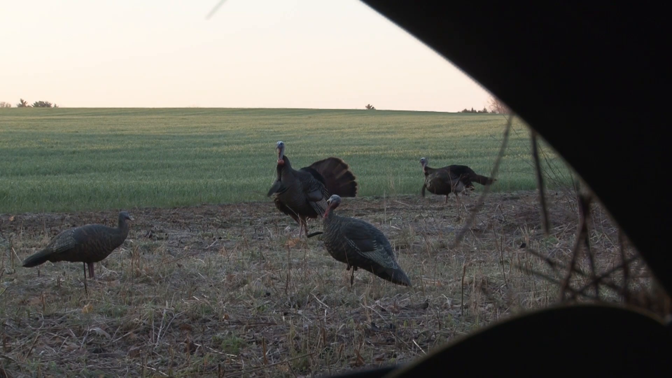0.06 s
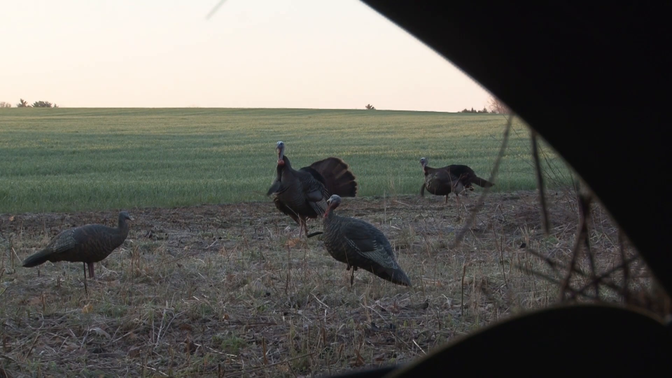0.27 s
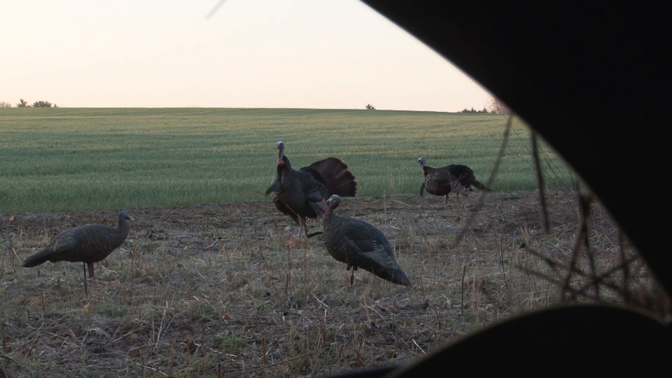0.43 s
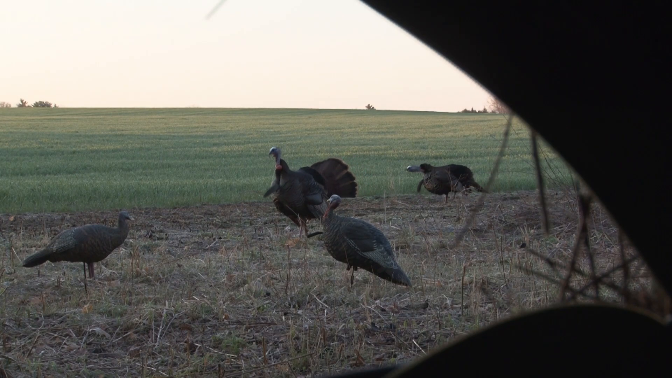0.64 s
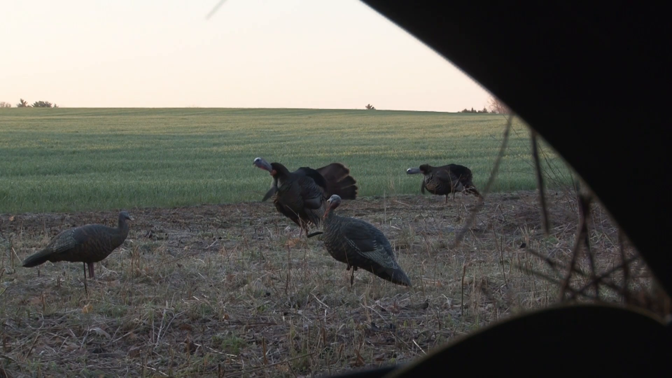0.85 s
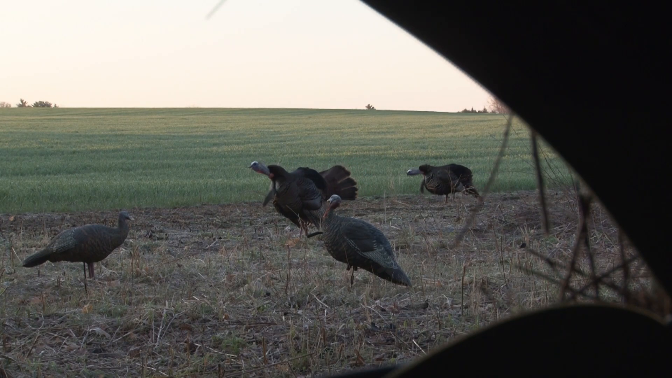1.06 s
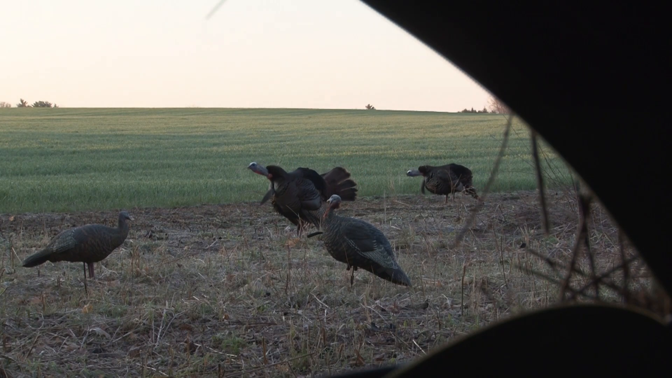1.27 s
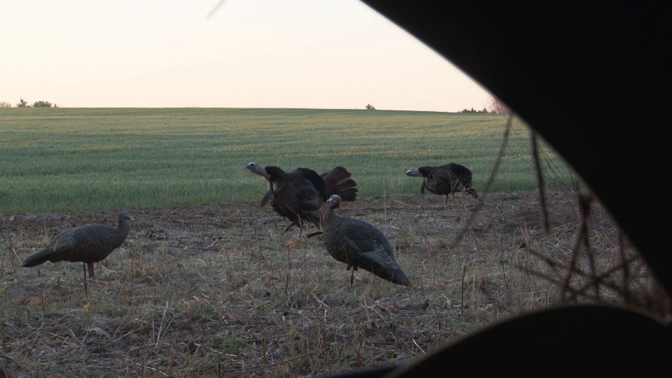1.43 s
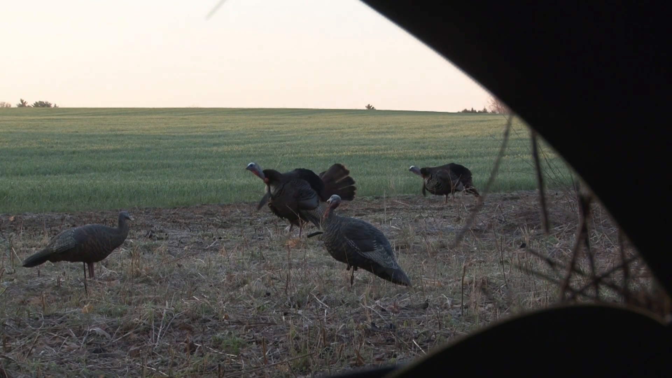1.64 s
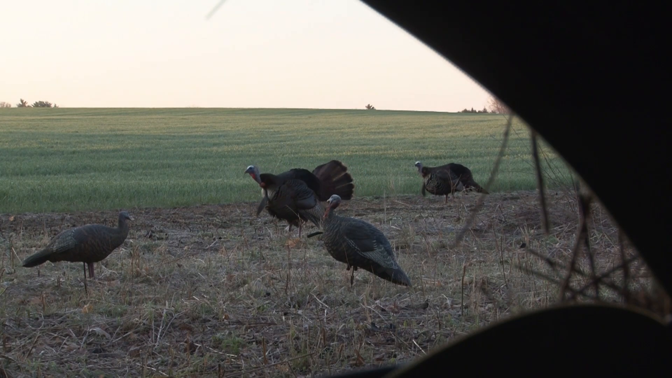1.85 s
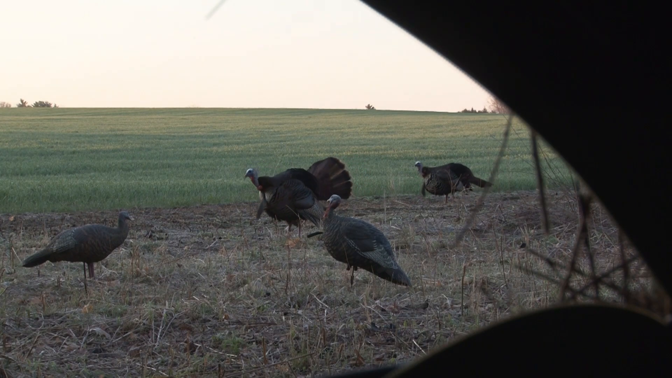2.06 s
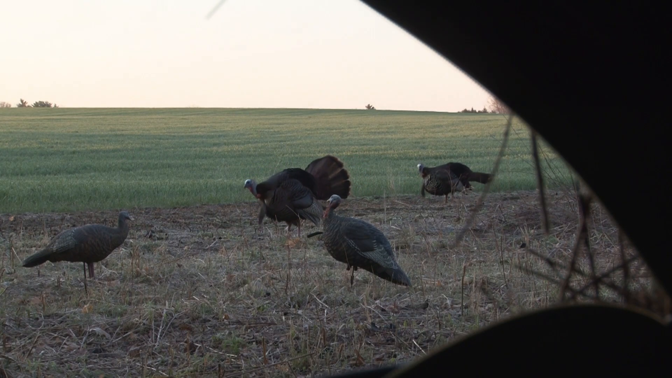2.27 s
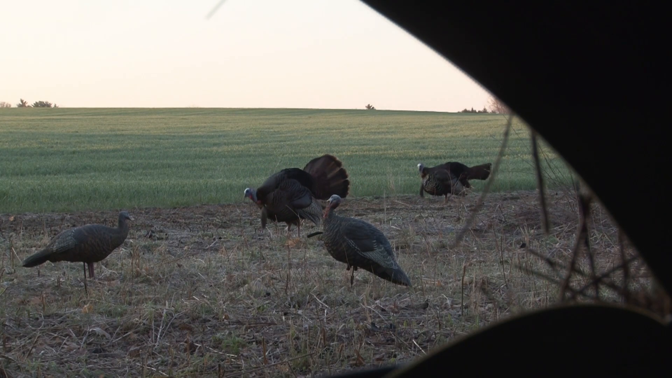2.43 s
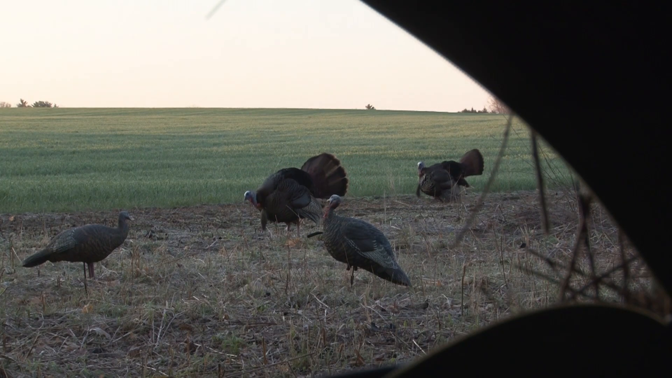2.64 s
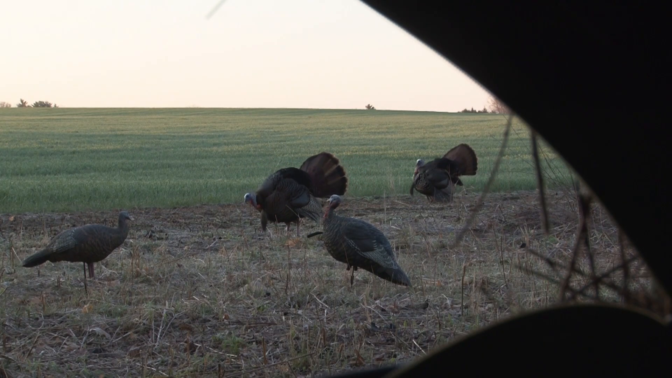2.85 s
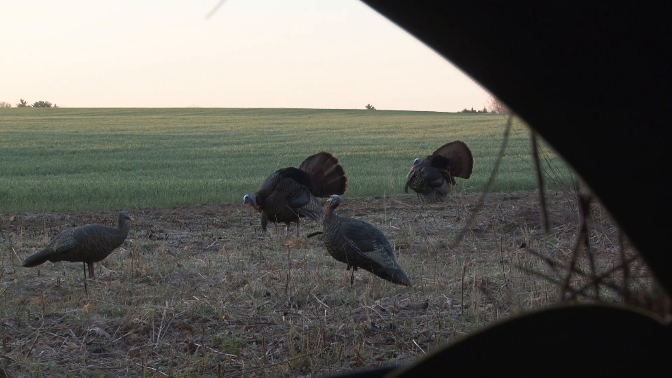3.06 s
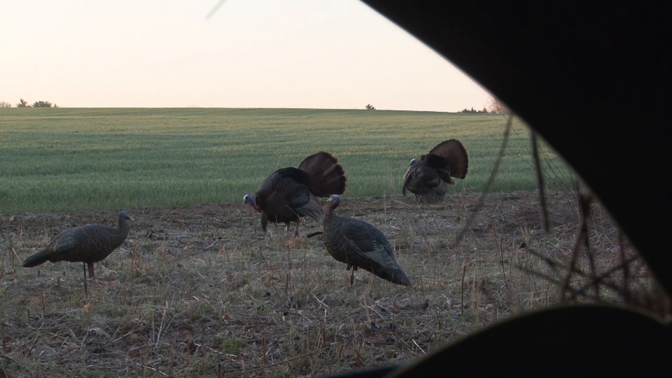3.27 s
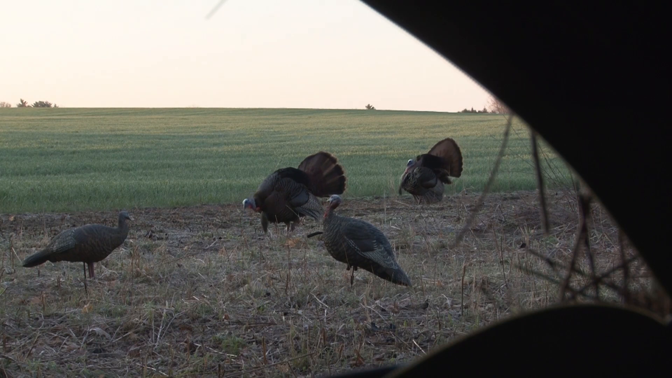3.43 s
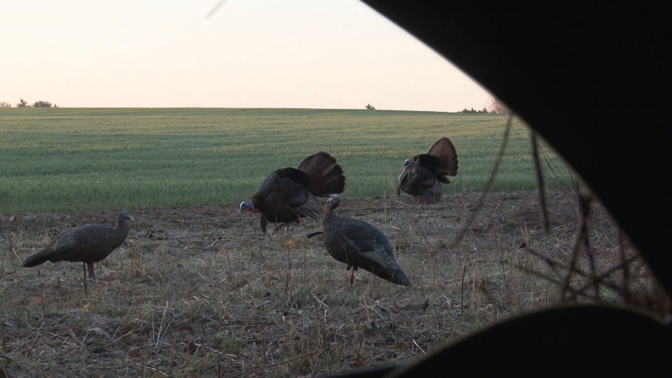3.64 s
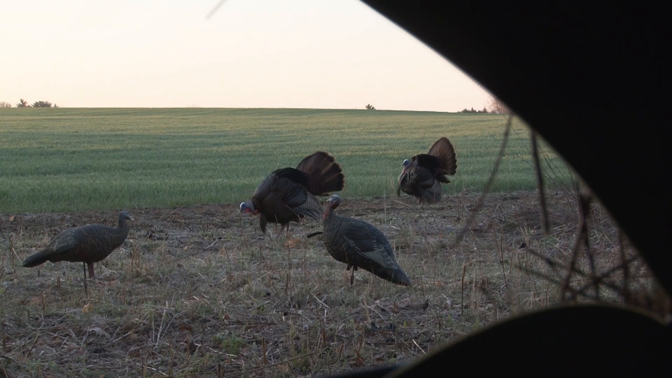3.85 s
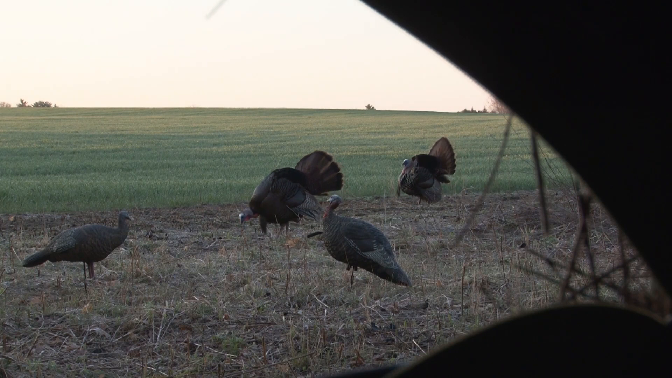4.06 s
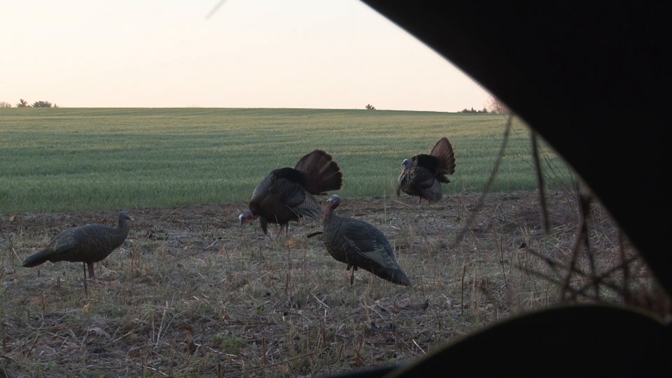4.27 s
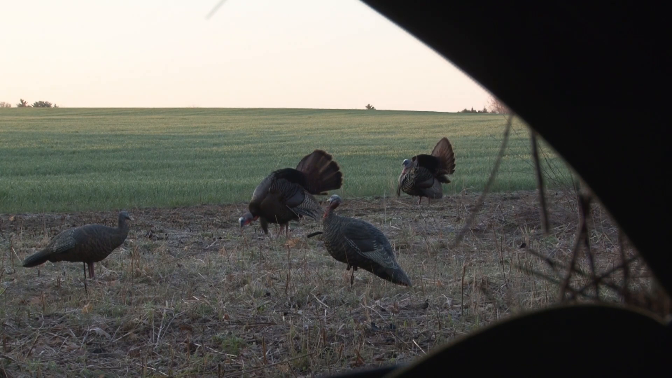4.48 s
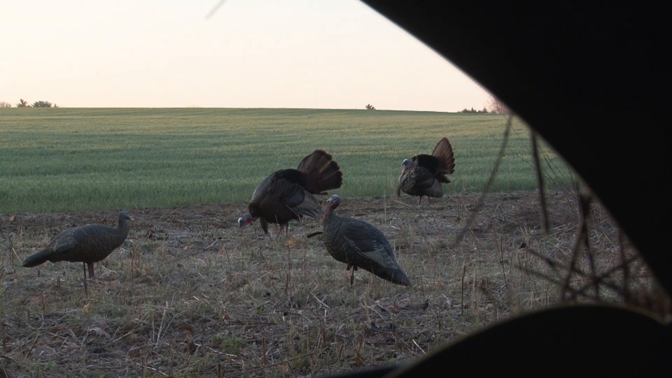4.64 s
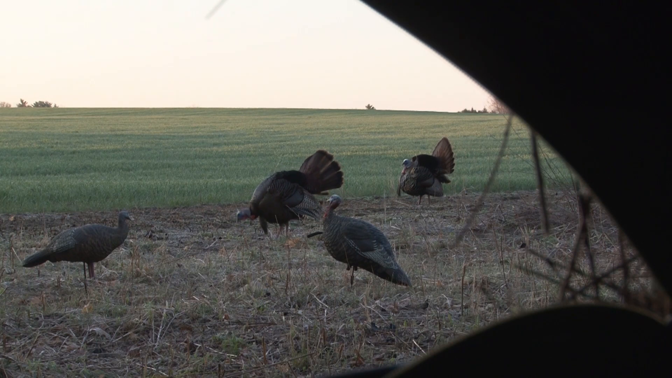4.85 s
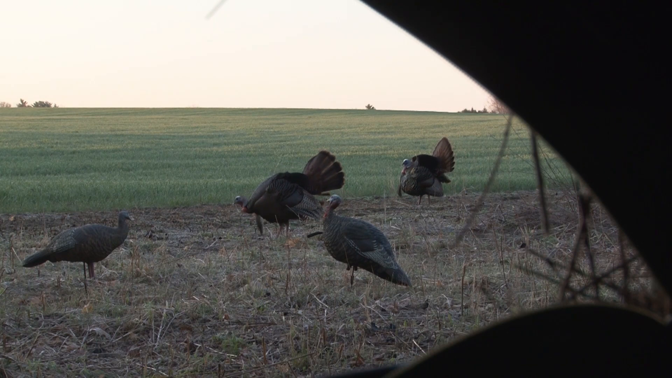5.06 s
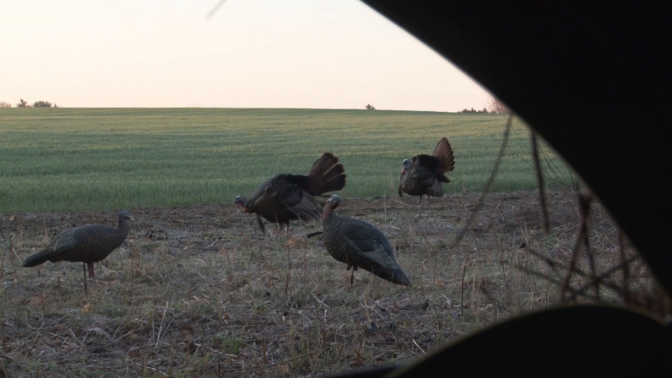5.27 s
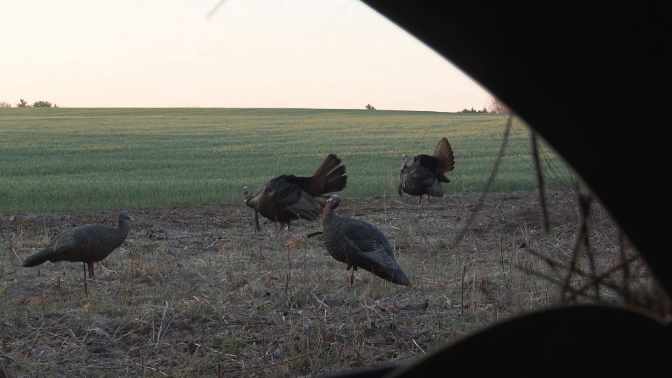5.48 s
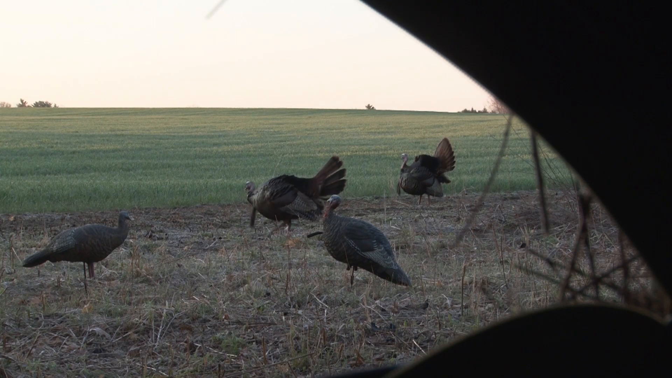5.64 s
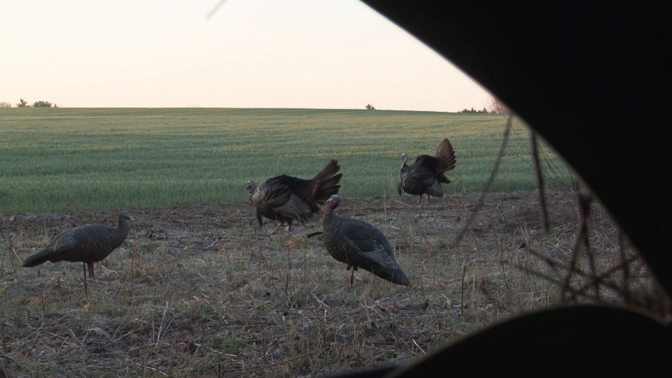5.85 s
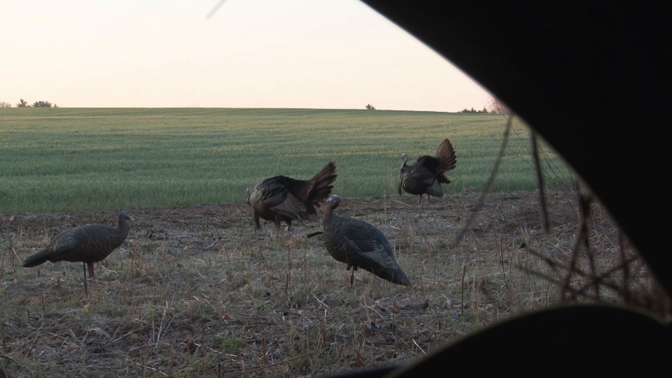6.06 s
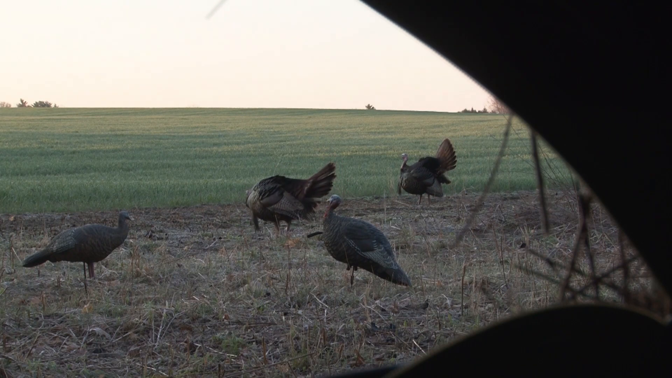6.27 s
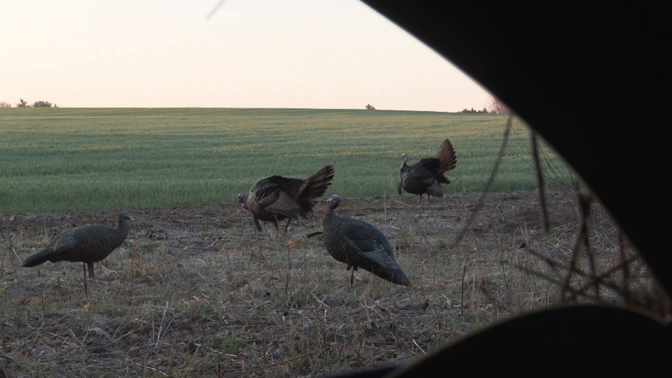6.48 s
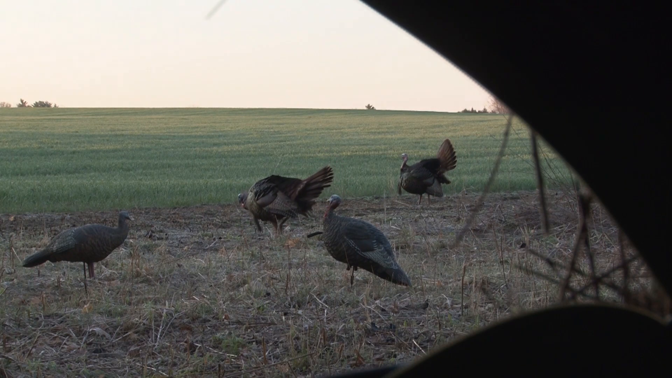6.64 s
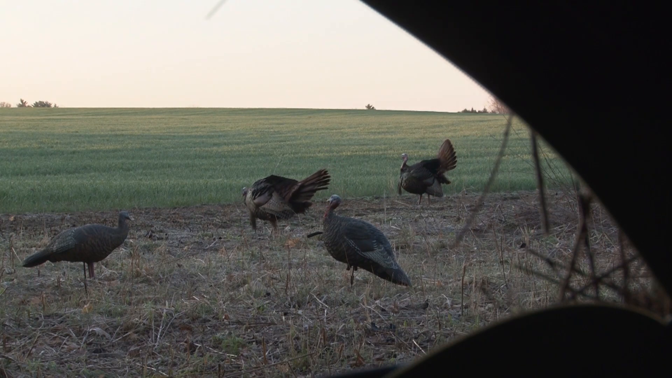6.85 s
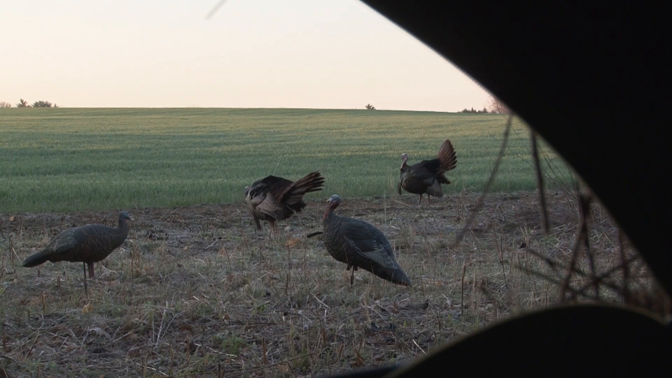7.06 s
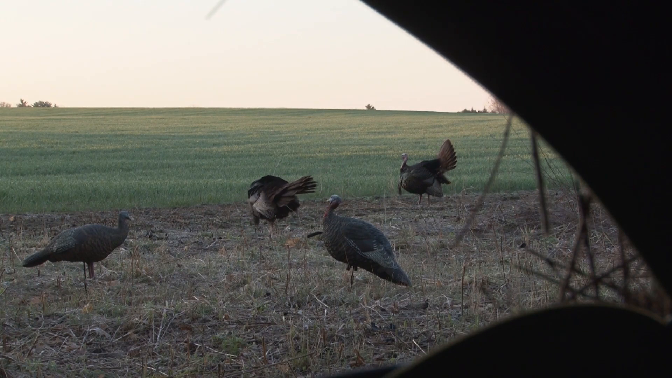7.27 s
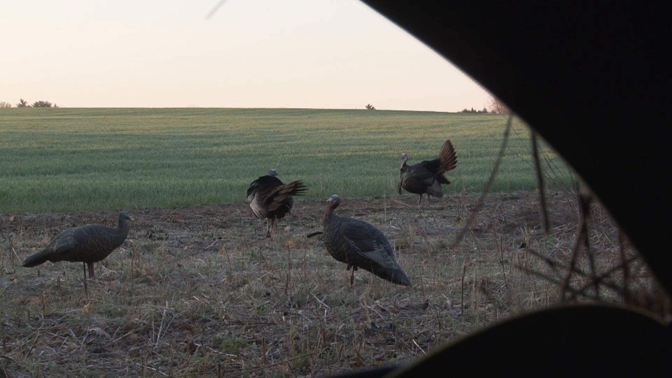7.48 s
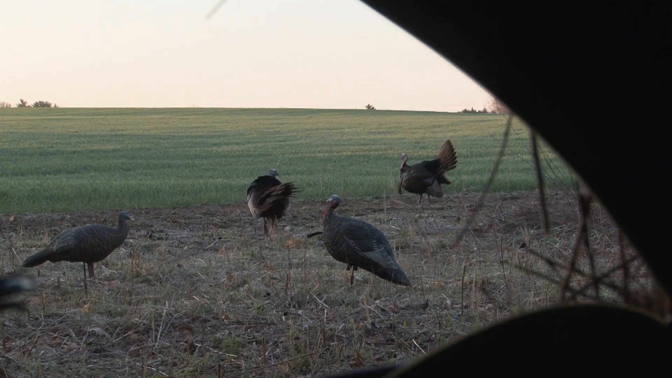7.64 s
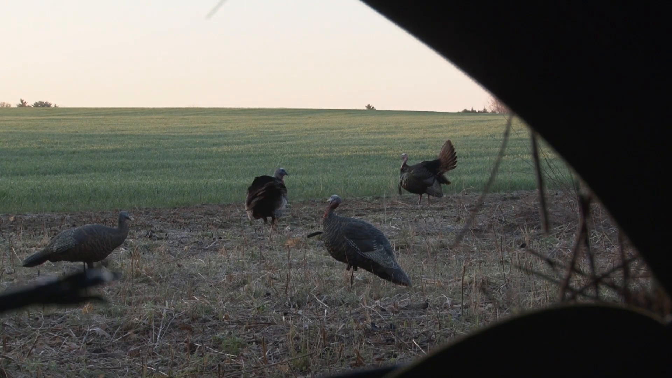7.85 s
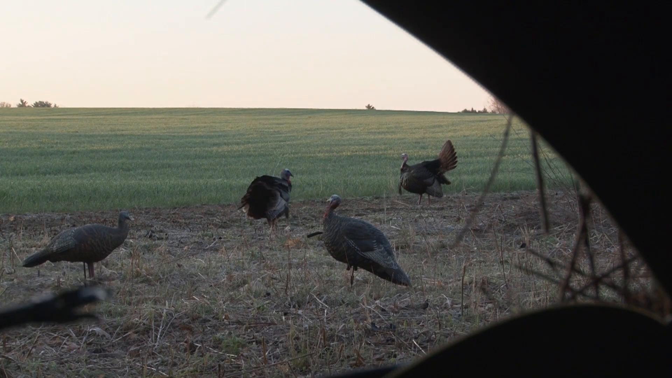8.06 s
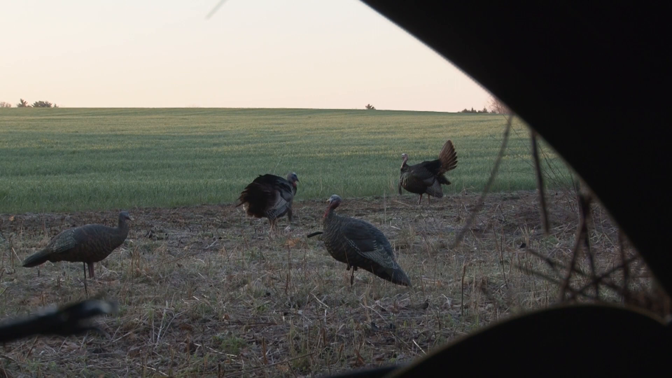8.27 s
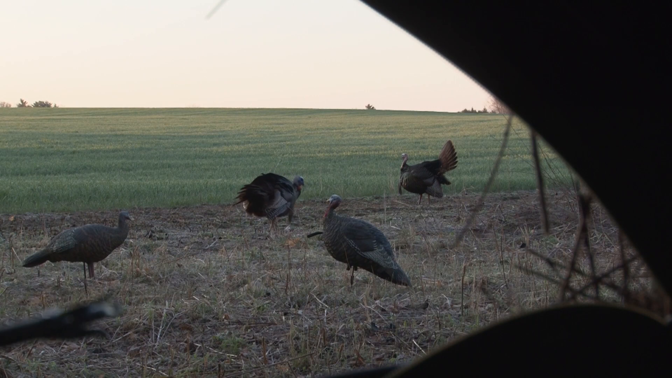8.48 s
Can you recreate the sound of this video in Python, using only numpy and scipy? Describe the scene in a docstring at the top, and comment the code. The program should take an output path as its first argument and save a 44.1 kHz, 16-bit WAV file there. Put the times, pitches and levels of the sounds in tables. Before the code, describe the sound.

A wild turkey tom gobbles loudly nearby, hoarse yelps tumbling into a fast rattle, a second joining farther off, then quiet field hum, rustles and faint birdsong.

```python
"""An open field: far hum, wash, hiss and road drone, coloured noises, under a thin steady whine (a sine).
At 0.5 s a wild turkey tom gobbles a few metres from a ground blind, and a second one further off joins in.
Rough harmonic syllables, yelps then rattle, ride on a low noise throb; blind, stubble and trees scatter them.
The level dips briefly at 2.2 s. Shaped noise then gives scuffs, snaps and rustles in the dry stalks,
and gliding sines give faint songbirds from 3.4 s. The drone fades from 3.1 s."""
import sys
import numpy as np
from scipy import signal
from scipy.fft import rfft, irfft
from scipy.io import wavfile

SR = 44100
rng = np.random.default_rng(int(sys.argv[2]) if len(sys.argv) > 2 else 0)


def wav_record(signal):
    """Record a signal, one row per channel, as 16-bit PCM in the file named by sys.argv[1]."""
    frames = np.transpose(np.atleast_2d(signal))
    bounded = np.clip(frames, -1, 1)
    # unit amplitude maps onto the largest positive 16-bit level
    quanta = np.round(bounded * 32767).astype(np.int16)
    wavfile.write(sys.argv[1], SR, quanta)


N = 375291
TIME = np.arange(N) / SR
FREQ = np.maximum(np.arange(N // 2 + 1) * SR / N, 1)

# swell of background and road: [t/s, level/dB]
SWELL = [(.18, -8), (.45, 3), (1.9, 2), (2.35, 0.5), (8.5, 0)]
# hoarse yelps that open the gobble: [mid t/s, half length/s, level/dB, pitch f/Hz, glide/+-share,
# throat resonance f/Hz, roughness/0-1, rasp level re syllable/dB]
YELPS = [(0.535, 0.03, -24, 588, 0.073, 1660, 0.44, -28),
         (0.594, .037, -26, 661.5, -0.15, 1320, 0.78, -16.5),
         (0.668, 0.032, -36, 634, -0.17, 1300, 0.72, -18), (0.723, .014, -31, 550, 0.11, 1390, 0.5, -14.5),
         (0.742, .025, -25, 529, .07, 1540, 0.46, -20), (0.769, .024, -24.5, 607, -0.039, 1450, 0.52, -30),
         (0.79, 0.018, -24, 670, -0.055, 1266, 0.11, -20.5),
         (.808, .024, -26, 532.3, -0.273, 1030, 0.39, -18),
         (0.878, .03, -35, 547, -0.101, 1190, 0.88, -17.5)]
# beats of the rattle that follows: [mid t/s, half length/s, level/dB, throat resonance f/Hz]
RATTLE = [(0.914, 0.011, -38, 1490), (.929, .028, -28.5, 1338), (0.959, .02, -28.5, 1293),
          (0.977, .017, -29, 1390), (1.001, .016, -28.5, 1295), (1.017, .023, -27.5, 984),
          (1.079, 0.032, -32, 1237), (1.12, .012, -27.5, 1246), (1.133, .023, -28, 1490),
          (1.203, 0.028, -32, 1061), (1.261, 0.018, -27, 1063), (1.299, .034, -28.5, 1415),
          (1.38, 0.029, -25.5, 1286), (1.439, .017, -25, 1171), (1.462, .035, -27, 1381),
          (1.528, 0.015, -28, 1055), (1.546, .02, -27.5, 1153), (1.604, 0.017, -27.5, 1024),
          (1.663, 0.013, -34, 1097)]


def undb(db):
    """Decibels to gain."""
    return 10 ** (np.asarray(db) / 20)


def unit(x):
    """Scale to rms 1."""
    return x / np.sqrt(np.mean(x ** 2) + 1e-20)


def curves(table):
    """Columns of a time table, one value a sample."""
    s, *columns = np.transpose(table)
    return [np.interp(TIME, s, c) for c in columns]


def colour(points):
    """Gain at every frequency from (f/Hz, level/dB) points, linear in log f."""
    hz, db = np.transpose(points)
    return undb(np.interp(np.log(FREQ), np.log(hz), db))


def filtered(x, gain):
    """Apply a gain per frequency."""
    return irfft(rfft(x) * gain, N)


def noise(gain, channels=2):
    """Independent coloured noises, rms 1 overall."""
    return unit(filtered(rng.standard_normal((channels, N)), gain))


def resonance(hz, centre_hz, width_hz):
    """Gain of one resonance, 1 at its centre."""
    return 1 / np.sqrt(1 + ((hz ** 2 - centre_hz ** 2) / (hz * width_hz)) ** 2)


def walk(rate_hz, size=N):
    """Smooth random curve, spread near 1, with rate_hz new values a second."""
    place = np.arange(size) * rate_hz / SR
    count = int(place[-1]) + 2
    return np.interp(place, np.arange(count), rng.standard_normal(count)) * np.sqrt(3 / 2)


def bump(t, centre_s, width_s):
    """Gaussian rise and fall, 1 at its centre."""
    return np.exp(-((t - centre_s) / width_s) ** 2)


def pan(x, left_db):
    """Place a sound by its left minus right level."""
    return x * undb(np.array([[left_db], [-left_db]]) / 2)


def tilt(points):
    """Left and right gains from left minus right (f/Hz, level/dB) points."""
    ratio = colour(points)
    return np.sqrt([ratio, 1 / ratio])


def add(track, start_s, x):
    """Mix x into the track at a time."""
    i = int(start_s * SR)
    track[i:i + len(x)] += x[:N - i]


def background(flicker_db=0.65):
    """Far low hum, mid wash and treble hiss, each flickering on its own, plus a steady sine whine."""
    # relative spectrum: [f/Hz, level/dB per Hz]
    air_points = [(25, -23), (45, -22), (65, -9.5), (95, 0), (135, -13), (240, -19), (400, -15.5),
                  (700, -11), (950, -8.5), (1200, -14.5), (1550, -15.5), (2100, -29.5), (3800, -36),
                  (15000, -42)]
    # left minus right: [f/Hz, level/dB]
    air_pan = [(60, -16), (110, -16.5), (200, -15.5), (380, -0.5), (700, 0.5), (1300, 5.5), (2400, 4),
               (5000, 2.5), (15000, -3)]
    # extra level of the mid band: [t/s, level/dB]
    wash_levels = [(.3, -0.5), (1.8, 1.5), (2.8, -2), (4.8, -0.5), (5.5, 0), (8.5, 0.5)]
    air_db, hum_db = -53.5, -1.5
    whine_hz, whine_db = 13415, -94

    air = filtered(noise(colour(air_points)), tilt(air_pan))
    low = 1 / (1 + (FREQ / 300) ** 4)
    high = 1 / (1 + (2200 / FREQ) ** 4)
    hum = filtered(air, low) * undb(hum_db + 2 * flicker_db * walk(12))
    wash = filtered(air, 1 - low - high) * undb(curves(wash_levels)[0] + flicker_db * walk(12))
    hiss = filtered(air, high) * undb(flicker_db / 2 * walk(12))
    whine = undb(whine_db) * np.sqrt(2) * np.sin(2 * np.pi * whine_hz * TIME)
    return undb(air_db + curves(SWELL)[0]) * (hum + wash + hiss) + whine


def road(centre_hz=715, width_hz=190, road_db=-57.5, leaves_s=3.12, fade_db_per_s=5):
    """Far drone, a narrow noise band, that fades as the traffic moves away."""
    fade_db = fade_db_per_s * np.maximum(TIME - leaves_s, 0)
    return noise(resonance(FREQ, centre_hz, width_hz) ** 2) * undb(road_db + curves(SWELL)[0] - fade_db)


def syllables():
    """Whole gobble, yelps then rattle, in the columns of YELPS; the rattle settles as the air runs out."""
    start_hz, settled_hz, settle_s = 578.5, 474, 0.168
    # a throat tuned above rest pulls the pitch up; pull is an exponent
    rest_throat_hz, throat_pull = 1245, 0.2454
    glide, rough, rasp_db = -0.0603, 0.33, -15.5
    rows = list(YELPS)
    for s, half_s, db, throat_hz in RATTLE:
        air_left = np.exp(-(s - RATTLE[0][0]) / settle_s)
        pull = (throat_hz / rest_throat_hz) ** throat_pull
        hz = (settled_hz + (start_hz - settled_hz) * air_left) * pull
        rows.append((s, half_s, db, hz, glide, throat_hz, rough, rasp_db))
    return rows


def neck(s, start_s=0.59, time_s=0.14):
    """The neck stretches out once: the windpipe rings more, the throat narrows and its skirts flatten."""
    # share of the wave sent back, throat width/Hz, skirt steepness
    pulled_in, stretched = np.array([.04, 1100, 3.04]), np.array([0.24, 600, 1.9])
    drawn_in = np.exp(-max(s - start_s, 0) / time_s)
    return drawn_in * pulled_in + (1 - drawn_in) * stretched


def windpipe(x, pitch_hz, share):
    """A wave returning once a cycle deepens the valleys between the partials; rms is kept."""
    feedback = np.r_[1, np.zeros(round(SR / pitch_hz) - 1), -np.clip(share, 0, .8)]
    return unit(signal.lfilter([1], feedback, x)) * np.sqrt(np.mean(x ** 2))


def syllable(half_s, pitch_hz, glide, throat_hz, rough, throat_width_hz, steep,
             leak_db=-28, half_db=-10, sharp=1.59, order=7):
    """One syrinx burst: an unsteady harmonic stack in the throat resonance, and the air flow it chops."""
    size = int(2 * half_s * SR)
    u = np.linspace(-1, 1, size)
    # slow bend plus faster jitter
    bend = .018 * walk(130, size) + .075 * rough * walk(400, size)
    hz = pitch_hz * (1 + glide * u) * np.exp(bend)
    phase = 2 * np.pi * np.cumsum(hz) / SR
    k = np.arange(1, order + 1)[:, None]
    centre_hz = throat_hz * (1 + glide * u)  # throat glides with the pitch
    leak = undb(leak_db) * resonance(k * hz, 2150, 2000)
    weight = (resonance(k * hz, centre_hz, throat_width_hz) ** 2 + leak) ** (steep / 2)
    weight = weight * undb(2.8 * np.array([walk(150, size) for _ in k]))
    # the throat delays partials above its resonance, so each cycle rings on
    lag = 2 * np.arctan((k * hz - centre_hz) / (throat_width_hz / 2))
    tone = np.sum(weight * np.cos(k * phase - lag), axis=0)
    # driven hard, the membranes beat strong-weak and their cycles vary in size
    uneven = undb(4.2 * rough * walk(380, size))
    uneven = uneven * (1 + 2 * rough * undb(half_db) * np.cos(phase / 2))
    swell = np.cos(np.pi * u / 2).clip(0) ** sharp
    voice = unit(tone * uneven * swell) * np.sqrt(np.mean(swell ** 2))
    flow = swell * unit(uneven * (1 + 0.53 * np.cos(phase)))
    return voice, flow


def gobble(rows, husk_db=-2.5):
    """A string of syllables, with syrinx-pulsed turbulence: a husk in the throat, a rasp in the treble."""
    # throat turbulence: [f/Hz, level/dB]
    husk_points = [(200, -33), (520, -3), (750, 3.5), (1000, 11.5), (1500, 2), (2050, 11.5), (2400, 2),
                   (2800, -8), (3500, -29), (5000, -40)]
    # open beak: [f/Hz, level/dB]
    beak_points = [(450, -4.5), (620, 2.5), (850, 1.5), (1100, 1.5), (1350, -3), (1600, 0), (1850, -3.5),
                   (2060, 0.5), (2380, -7), (2750, 0), (3300, -6), (5000, 2)]
    # treble turbulence: [f/Hz, level/dB]
    rasp_points = [(1800, -15), (2800, 6), (3700, 2), (4500, 0.5), (5400, -0.5), (6400, -2.5), (8000, -20),
                   (11000, -39), (15000, -42)]

    voice, rasp = np.zeros((2, N))
    husk = noise(colour(husk_points), channels=1)[0]
    for s, half_s, db, pitch_hz, glide, throat_hz, rough, rasp_db in rows:
        share, width_hz, steep = neck(s)
        tone, flow = syllable(half_s, pitch_hz, glide, throat_hz, rough, width_hz, steep)
        # steep skirts also muffle the turbulence
        husk_gain = undb(husk_db) * np.sqrt(abs(rough)) / (steep / 2) ** 2
        tone = tone + husk_gain * flow * husk[int(s * SR):][:len(flow)]
        add(voice, s - half_s, undb(db) * windpipe(tone, pitch_hz, share))
        add(rasp, s - half_s, undb(db + rasp_db) * flow)
    return filtered(voice, colour(beak_points)) + rasp * noise(colour(rasp_points), channels=1)[0]


def near_tom(bark_db=-31, bark_s=.532, bark_width_s=0.015, catch_width_s=.0055, crackle_db=4):
    """Gobble with a hoarse noise bark at its opening and a few sharp, crackling catches."""
    # rasping catches: [t/s, level/dB]
    catch_rows = [(0.595, -51.5), (0.72, -57.5), (0.808, -56), (.965, -56), (1.123, -50), (1.303, -50)]
    hoarse = noise(resonance(FREQ, 1900, 1230) ** 3, channels=1)[0]
    bark = undb(bark_db) * bump(TIME, bark_s, bark_width_s) * hoarse
    catches = sum(undb(db) * bump(TIME, s, catch_width_s) for s, db in catch_rows)
    crackle = noise(resonance(FREQ, 5300, 9000), channels=1)[0] * undb(crackle_db * walk(2100))
    return gobble(syllables()) + bark + catches * unit(crackle)


def chest(right_db=18, throb_db=-51.5, lag_s=0.0047, width_s=0.023):
    """Low throb on the right, noise pushed just after each near syllable, swelling late in the gobble."""
    # throb: [f/Hz, level/dB]
    throb_points = [(30, -48), (55, -20), (80, 1), (110, -3.5), (145, -12.5), (180, -8.5), (250, -24),
                    (450, -14), (800, -61)]
    swell_db, peak_s, swell_s = 10.5, 1.505, .17
    mids = [row[0] for row in list(YELPS) + list(RATTLE)]
    pushes = np.max([bump(TIME, s + lag_s, width_s) for s in mids], axis=0)
    level_db = throb_db + swell_db * bump(TIME, peak_s, swell_s)
    return pan(noise(colour(throb_points), channels=1) * np.sqrt(pushes) * undb(level_db), -right_db)


def far_tom(far_db=-13, late_s=.036, pitch_ratio=1.03, start_s=.62, end_s=1.69):
    """Second tom: the same syllable pattern, later and higher, duller with distance."""
    rows = []
    for s, half_s, db, hz, *rest in syllables():
        if start_s < s + late_s < end_s:
            rows.append((s + late_s, half_s, db, hz * pitch_ratio, *rest))
    return undb(far_db) * filtered(gobble(rows), resonance(FREQ, 1600, 4700))


def ports(x, lag_s):
    """A sound reaches the right microphone lag_s after the left."""
    return np.array([x, filtered(x, np.exp(-2j * np.pi * FREQ * lag_s))])


def echo(x, delay_s, t60_s, centre_hz, width_hz):
    """Diffuse reflections as decaying noise, different at each microphone; unit gain at 800-2000 Hz."""
    age_s = np.maximum(TIME - delay_s, 0)
    decay = undb(-60 * np.minimum(age_s / t60_s, 3)) * (age_s > 0)
    response = rfft(noise(resonance(FREQ, centre_hz, width_hz)) * decay)
    mid = response[:, (FREQ > 800) & (FREQ < 2000)]
    return filtered(x, response / np.sqrt(np.mean(abs(mid) ** 2)))


def field(near, far, near_lag_s=0.00011, far_lag_s=-0.000035, blind_db=-11, stubble_db=-13, trees_db=-18):
    """Toms call from two directions; the blind, the stubble and far trees scatter the sound."""
    # left minus right of the toms: [f/Hz, level/dB]
    tom_pan = [(200, -11), (400, -6.5), (900, -5), (1400, -2.5), (2400, 1), (4400, -1.5), (8000, 10),
               (15000, -4)]
    direct = ports(near, near_lag_s) + ports(far, far_lag_s)
    blind = undb(blind_db) * echo(near, .001, .04, 4500, 5000)
    stubble = undb(stubble_db) * echo(near + far, 0.0071, 0.86, 1700, 3900)
    trees = undb(trees_db) * echo(near + far, 0.067, 1.7, 640, 980)
    return filtered(direct + blind, tilt(tom_pan)) + stubble + trees


def stalks(crackle_db=2.5):
    """Scuffs, snaps and soft low bumps as resonant noise bursts, and a spell of soft uneven rustle."""
    # rustle: [f/Hz, level/dB]
    rustle_points = [(500, 5), (2000, 4.5), (3000, 2.5), (6000, 2.5), (9000, -4), (15000, -16)]
    # scuffs, snaps, bumps: [t/s, level/dB, centre f/Hz, width/Hz, rise/s, decay/s]
    scuff_rows = [(2.311, -50.5, 4270, 2000, 0.0028, 0.012), (2.8, -54.5, 240, 280, 0.051, .25),
                  (2.996, -52, 2350, 1100, 0.012, 0.026), (3.003, -61.5, 6560, 6000, 0.0051, 0.028),
                  (3.0, -51, 70, 70, 0.037, .07), (3.191, -47.5, 256, 262, 0.0065, 0.011),
                  (4.277, -56.5, 3400, 1900, 0.00085, .009), (4.55, -53, 70, 40, .22, .08),
                  (4.58, -67, 4480, 3000, 0.0091, .02), (6.698, -59, 3060, 2600, 0.0017, 0.023),
                  (7.93, -65, 5500, 4000, .003, 0.014), (8.14, -62.5, 4400, 5000, .003, 0.012)]
    stir_db, start_s, end_s, fade_s = -70.5, 6.55, 8.55, 0.23

    spell = np.clip(np.minimum(TIME - start_s, end_s - TIME) / fade_s, 0, 1)
    out = noise(colour(rustle_points)) * spell * undb(stir_db + crackle_db * walk(63))
    grit = rfft(rng.standard_normal((2, N)))
    for s, db, hz, width_hz, rise_s, decay_s in scuff_rows:
        rise = np.clip((TIME - s) / rise_s, 0, 1)
        decay = np.exp(-np.clip((TIME - s - rise_s) / decay_s, 0, 20))
        burst = unit(irfft(grit * resonance(FREQ, hz, width_hz) ** 2, N))
        out = out + undb(db) * rise * decay * burst
    return out


def songbirds(direct_db=-2, wet_db=-1, left_db=12, chip_db=-81, chip_hz=5000, chip_gap_s=.117, count=7):
    """Far warbled sine glides and a row of thin, uneven falling chips, blurred by the distance."""
    # notes before direct and wet gains: [t/s, length/s, start f/Hz, end f/Hz, level/dB]
    note_rows = [(4.19, .07, 2520, 2540, -75), (4.989, 0.087, 2640, 2700, -68.5),
                 (5.13, 0.057, 2810, 2850, -75), (5.48, 0.037, 3010, 2900, -73),
                 (5.52, 0.048, 2290, 2340, -70), (5.68, 0.067, 3300, 2840, -75),
                 (6.149, 0.15, 2895, 2770, -65.5), (6.19, 0.12, 2720, 2470, -68.5),
                 (6.371, 0.057, 3400, 3260, -67), (6.40, 0.039, 3200, 2660, -65.5),
                 (7.2, .26, 1306, 1694, -61), (7.33, 0.22, 1692, 1580, -63.5),
                 (7.46, 0.053, 2060, 2150, -69), (7.6, 0.55, 2775, 2680, -75)]
    chips = []
    for k, (late, loud) in enumerate(rng.standard_normal((count, 2))):
        s = 3.42 + k * chip_gap_s + .012 * late
        chips.append((s, .035, chip_hz * 1.07, chip_hz / 1.07, chip_db + 2 * loud))
    song = np.zeros(N)
    for s, length_s, start_hz, end_hz, db in list(note_rows) + chips:
        size = int(length_s * SR)
        hz = np.linspace(start_hz, end_hz, size) * (1 + .025 * walk(220, size))
        swell = np.sqrt(2 * np.hanning(size).clip(0))
        add(song, s, undb(db) * swell * np.sin(2 * np.pi * np.cumsum(hz) / SR))
    return pan(undb(direct_db) * song, left_db) + undb(wet_db) * echo(song, 0.014, 0.73, 1700, 6000)


def scene():
    """Gobbles over the quiet field."""
    return background() + road() + field(near_tom(), far_tom()) + chest() + stalks() + songbirds()


def record(dry, dip_s=2.17, dip_width_s=.019, dip_db=-15, top_hz=15620):
    """The level dips briefly after the gobble; the top is cut over 100 Hz above top_hz."""
    dipped = dry * undb(dip_db * bump(TIME, dip_s, dip_width_s))
    return filtered(dipped, np.clip((top_hz - FREQ) / 100 + 1, 0, 1))


dry = scene()
out = record(dry)
wav_record(out)
```